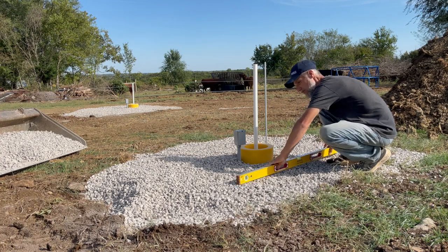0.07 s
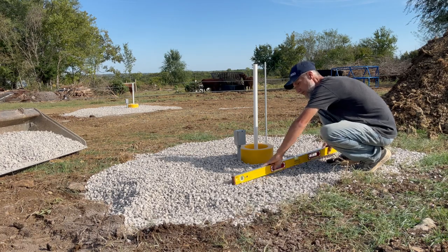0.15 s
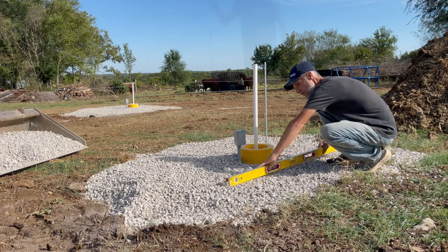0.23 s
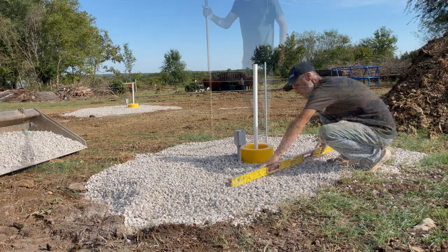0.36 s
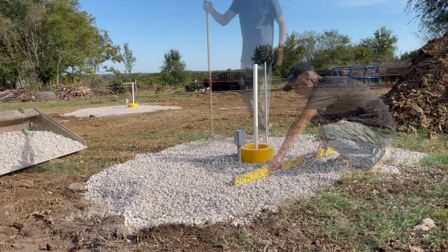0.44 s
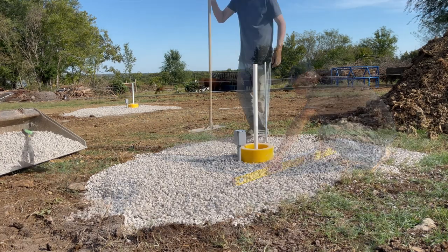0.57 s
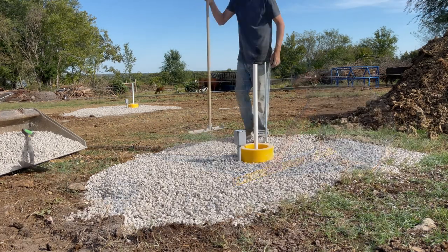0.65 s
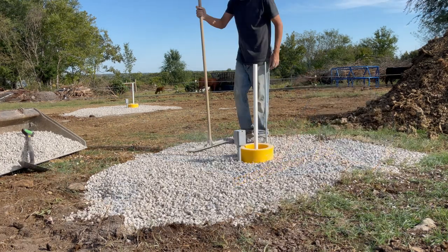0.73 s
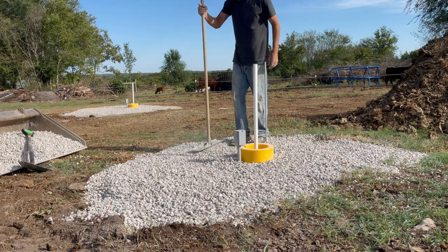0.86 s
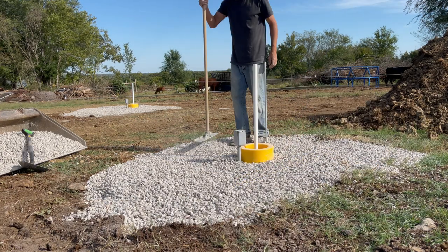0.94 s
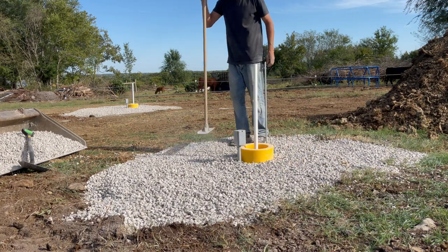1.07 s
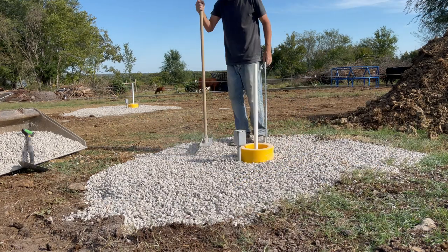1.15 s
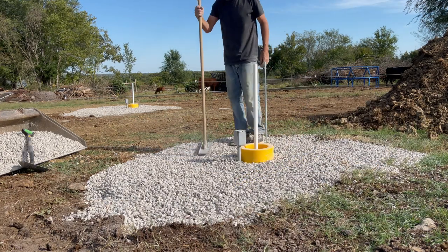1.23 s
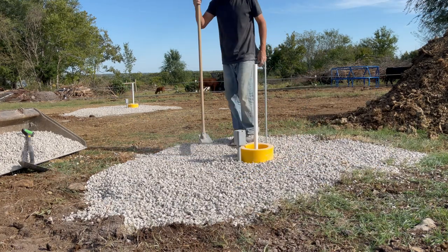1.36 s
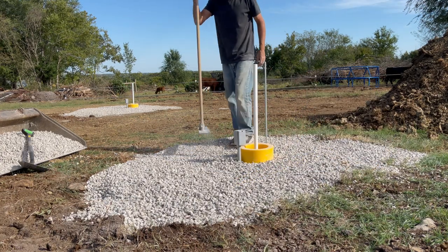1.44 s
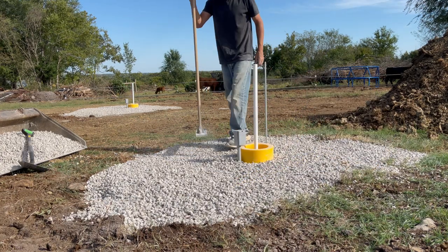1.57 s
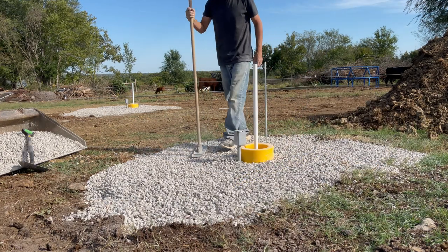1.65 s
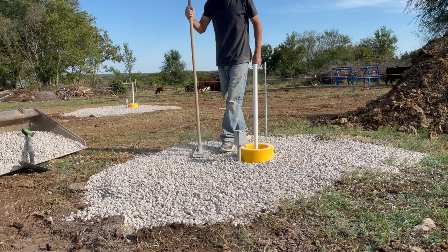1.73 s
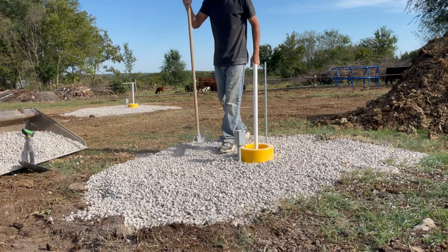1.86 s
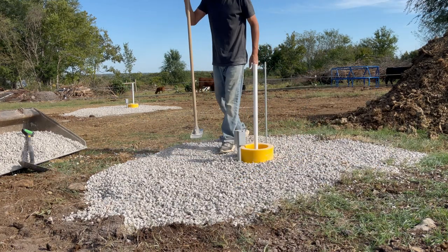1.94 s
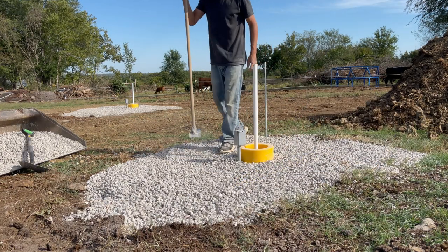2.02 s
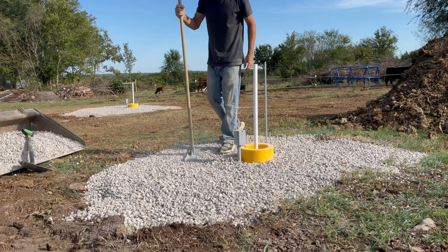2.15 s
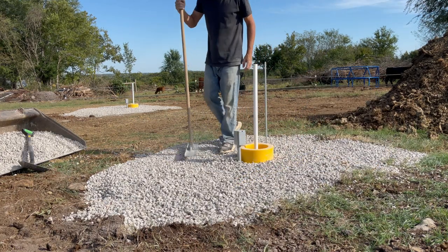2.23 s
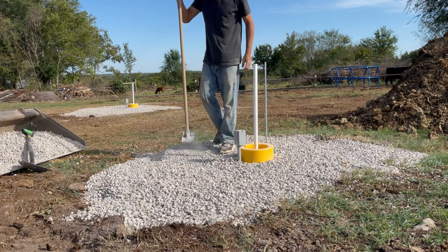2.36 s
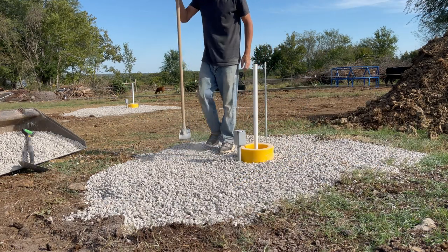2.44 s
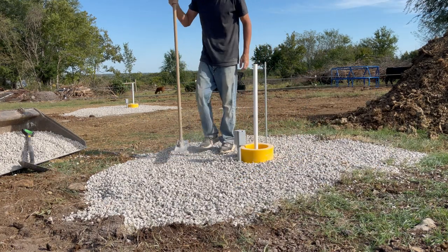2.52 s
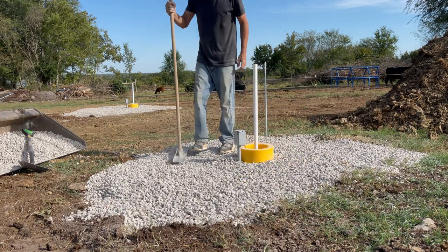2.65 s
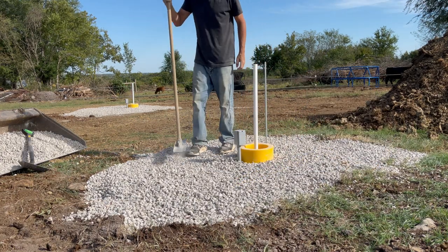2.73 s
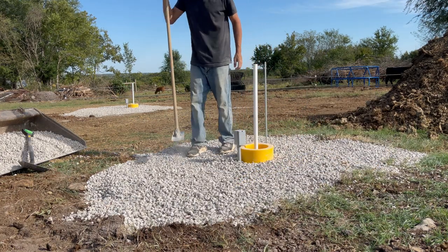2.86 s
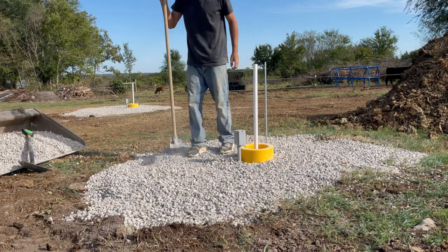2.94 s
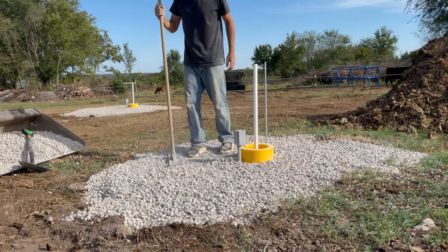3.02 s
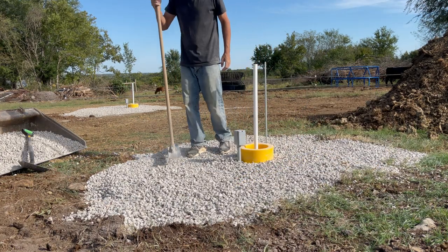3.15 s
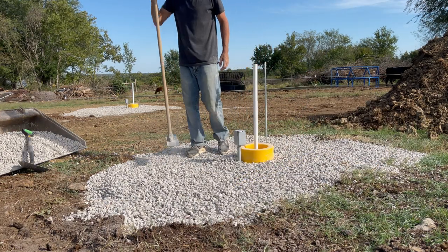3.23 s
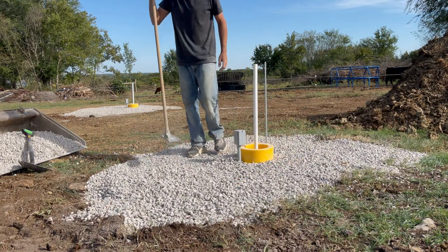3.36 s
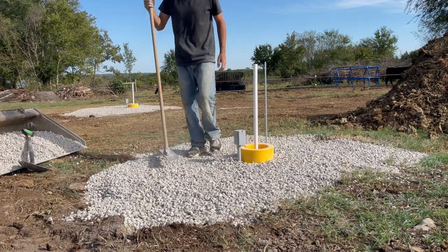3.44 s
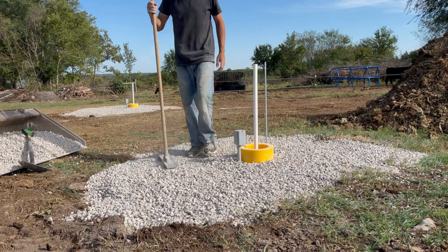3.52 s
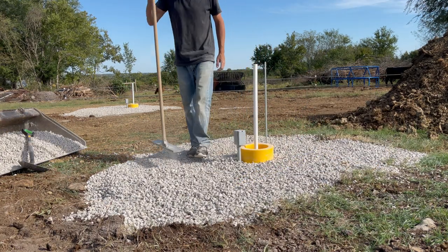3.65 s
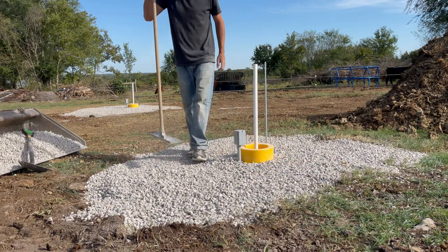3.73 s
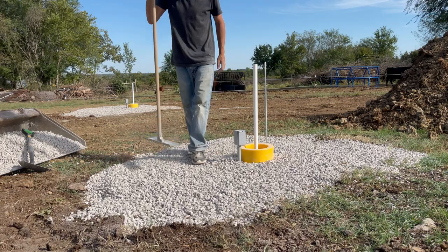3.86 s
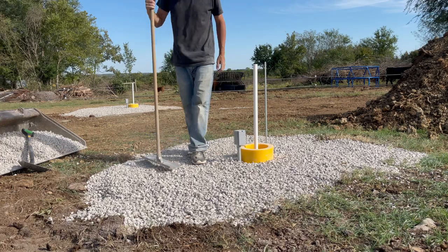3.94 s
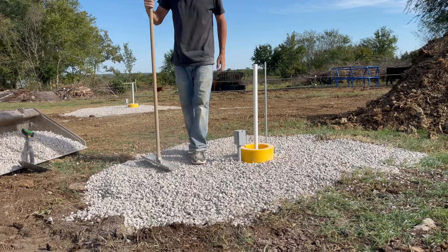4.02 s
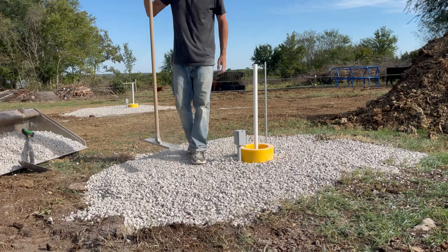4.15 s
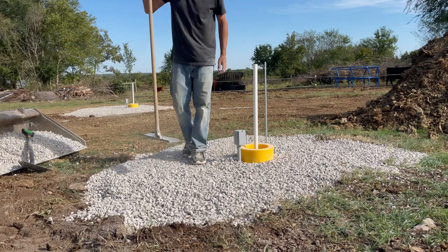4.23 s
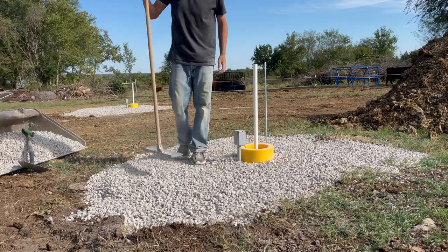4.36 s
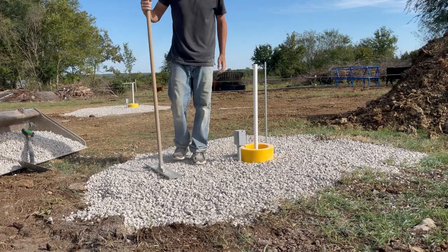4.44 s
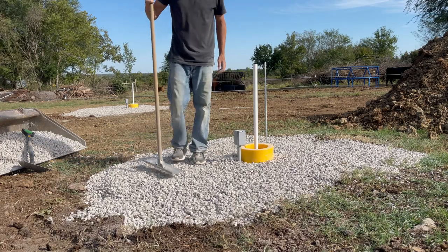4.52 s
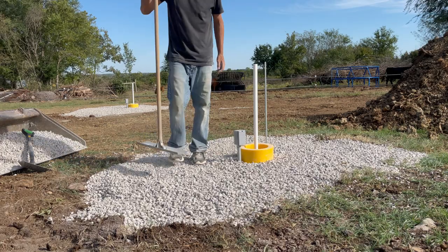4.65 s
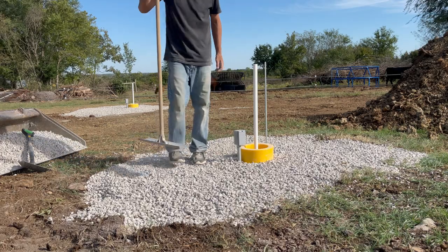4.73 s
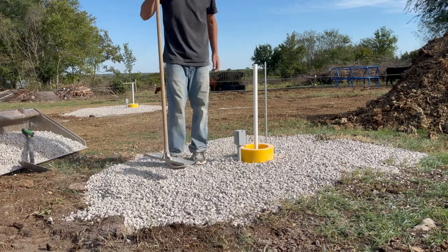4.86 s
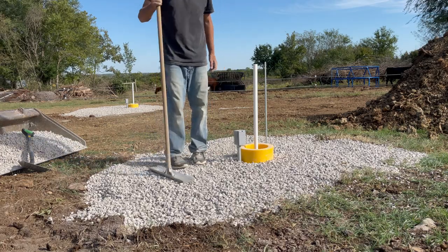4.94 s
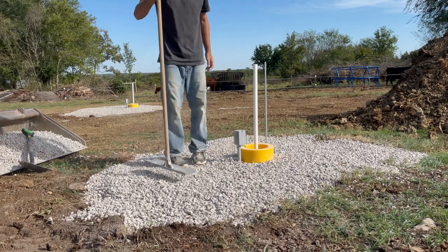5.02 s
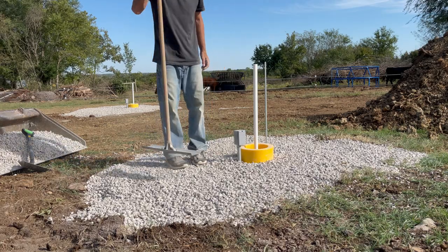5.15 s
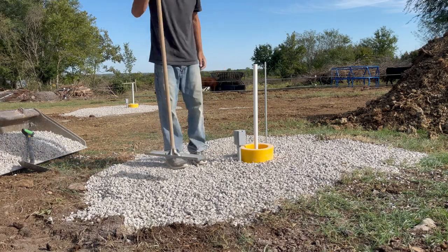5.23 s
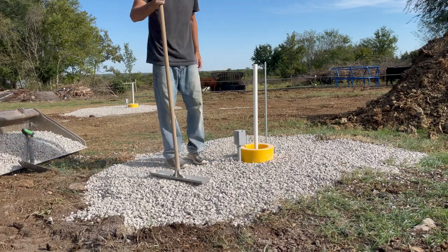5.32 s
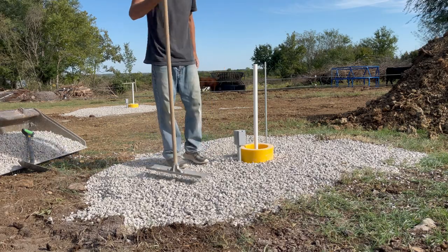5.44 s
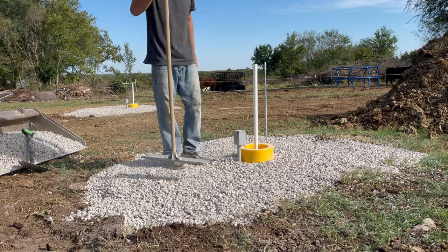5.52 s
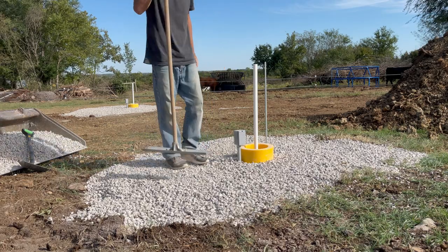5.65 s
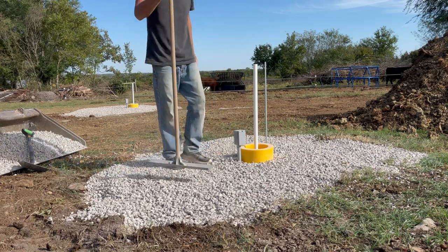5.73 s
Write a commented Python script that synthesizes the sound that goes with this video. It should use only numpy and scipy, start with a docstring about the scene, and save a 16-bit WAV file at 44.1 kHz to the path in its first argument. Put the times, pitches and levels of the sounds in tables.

```python
"""Hand tamper on crushed rock

A steel hand tamper is dropped on crushed rock again and again in an open field. Each blow crunches the
stones (filtered bursts of grains), thuds into the ground (a falling boom) and rings the plate (decaying modes).
Echoes return from around the field by convolution; boots scuff the gravel and single stones click.
Insects trill, buzz and tick (noise bands), two far birds call (partials), and gusts rumble on the microphone at first."""
import sys
import numpy as np
from scipy import signal
from scipy.fft import rfft, irfft, next_fast_len
from scipy.io import wavfile
from scipy.ndimage import uniform_filter1d

SR = 44100
rng = np.random.default_rng(int(sys.argv[2]) if len(sys.argv) > 2 else 0)


def to_wav(sig):
    """Store sig (one row per channel, or 1-D mono) as 16-bit WAV at the path in sys.argv[1].

    Samples outside -1..1 are clipped; the rate is SR.
    """
    pcm = np.clip(np.atleast_2d(sig), -1, 1) * 32767
    pcm = np.round(pcm).astype(np.int16)
    wavfile.write(sys.argv[1], SR, pcm.T)  # frames by channels


N = 255118
TIME = np.arange(N) / SR


def amp(db):
    """Level: decibels to amplitude gain."""
    return 10 ** (np.asarray(db) / 20)


def rms_one(x):
    """Normalisation: scale to unit rms."""
    return x / np.sqrt(np.mean(x ** 2) + 1e-20)


def in_time(rows):
    """Linear interpolation: each column of a (time, ...) table, sample by sample."""
    times, *columns = np.transpose(rows)
    return [np.interp(TIME, times, column) for column in columns]


def at_hz(points, hz):
    """Spectral interpolation: read (frequency, value) points on a log-frequency axis."""
    frequencies, values = np.array(points).T
    return np.interp(np.log(hz), np.log(frequencies), values)


def band(x, low_hz, high_hz):
    """Band limitation: a Butterworth band-pass."""
    edges = [low_hz, min(high_hz, .45 * SR)]
    return signal.sosfilt(signal.butter(2, edges, "band", fs=SR, output="sos"), x)


def drift(rate_hz):
    """Slow random modulation: low-passed chance at 100 knots per second, of rms 1."""
    knots = rng.standard_normal(int(N / SR * 100) + 2)
    r = np.exp(-2 * np.pi * rate_hz / 100)
    # a first pass over the knots settles the filter
    slow = signal.lfilter([1], [1, -r], np.tile(knots, 2))[len(knots):]
    return np.interp(TIME * 100, np.arange(len(knots)), rms_one(slow))


CENTRES = 220 * 2 ** np.arange(0, 6.4, 1 / 3)   # third-octave centres [Hz]


def bands(source):
    """Filter bank: overlapping third-octave slices, with centres, that add up between the end centres."""
    size = next_fast_len(N)
    spectrum = rfft(source, size)
    steps = 3 * np.log2(np.arange(1, size // 2 + 2) * SR / size)   # third-octaves
    masks = [np.cos(np.pi / 2 * np.clip(steps - 3 * np.log2(hz), -1, 1)) ** 2 for hz in CENTRES]
    return [(hz, irfft(spectrum * mask, size)[:N]) for hz, mask in zip(CENTRES, masks)]


STONE_T60_S = 0.007


def grains(per_s, spread_db, bed):
    """Stochastic contact: stone impacts of uneven size excite short resonances over a bed of noise; rms 1."""
    sizes = amp(spread_db * np.minimum(rng.exponential(1, N), 4)) * rng.choice([-1, 1], N)
    clicks = sizes * (rng.random(N) < per_s / SR) + 1e-18
    pitches_hz = np.linspace(500, 15500, 56) + rng.uniform(-120, 120, 56)
    dealt = rng.integers(0, 56, N)   # which pitch each contact gets
    r = amp(-60 / (STONE_T60_S * SR))
    rings = 0
    for k, hz in enumerate(pitches_hz):
        resonator = [1, -2 * r * np.cos(2 * np.pi * hz / SR), r * r]
        rings = rings + signal.lfilter([1, 0, -1], resonator, clicks * (dealt == k))
    return rms_one(rms_one(rings) + .5 * rms_one(clicks) + bed * rng.standard_normal(N))


# wind rumble: (time [s], level [dB])
WIND = [(0.0, -79), (0.29, -55.5), (0.5, -80), (0.8, -70), (1.7, -76), (1.88, -60.5), (2.05, -73),
        (3.5, -77), (4.5, -78.5), (4.9, -72.5), (5.78, -75)]
# single gusts: (time [s], level [dB], half length [s])
GUSTS = [(.005, -52, 0.0074), (0.096, -47, 0.033), (0.16, -44, 0.02), (0.234, -43, 0.025), (0.41, -55, .03),
         (0.479, -39.5, 0.02), (0.582, -45.5, 0.048)]
# hiss spectrum: (frequency [Hz], gain [dB])
AIR = [(150, -49), (250, -7.5), (1440, -16), (3230, -15), (6000, -24), (11400, -28), (15100, -27),
       (16500, -41)]
AIR_DB = -77   # rms of the whole hiss


def air():
    """Wind noise: low-frequency pressure fluctuations at the microphone, over the field's faint hiss."""
    rumble = rms_one(band(rng.standard_normal(N), 30, 230))
    buffet = band(rng.standard_normal(N), 41, 101)
    # evened out so that each gust lands with its full weight
    buffet = buffet / np.sqrt(uniform_filter1d(buffet ** 2, size=1500) + 1e-12)
    swells = sum(amp(db) * np.exp(-((TIME - s) / half) ** 2) for s, db, half in GUSTS)
    hiss = sum(amp(at_hz(AIR, hz)) * part for hz, part in bands(rng.standard_normal(N)))
    rumble_level = amp(in_time(WIND)[0] + 2.0 * drift(4.1))
    return rumble_level * rumble + swells * buffet + amp(AIR_DB) * rms_one(hiss)


# cricket trill: (frequency [Hz], half width [Hz], throb rate [1/s])
CRICKET = (7780, 220, 26.5)
# swell of the trill: (time [s], level [dB])
CRICKET_SWELL = [(0.0, -86), (1.5, -87), (2.4, -84), (3.6, -77), (4.4, -80), (5.78, -86)]
# high insect chorus: (frequency [Hz], width [Hz], level [dB])
BUZZ = (11600, 1400, -84)
# a katydid ticking: (time [s], level [dB], 7 dB above the tick's envelope)
TICKS = [(2.552, -76), (2.7601, -64), (2.825, -66), (2.8913, -51.5), (2.9567, -54), (3.022, -59),
         (3.1512, -43), (3.2176, -66), (3.282, -63)]


def insects():
    """Amplitude modulation: noise bands shaped into a throbbing trill, a wide high buzz and lone ticks."""
    hz, half_hz, throbs = CRICKET
    throb = np.clip(.8 + np.sin(2 * np.pi * throbs * TIME + .6 * drift(2)), .45, None)
    trill_level = amp(in_time(CRICKET_SWELL)[0] + 1.5 * drift(3))
    trill = rms_one(throb * band(rng.standard_normal(N), hz - half_hz, hz + half_hz))
    hz, width_hz, level_db = BUZZ
    buzz_level = amp(level_db + 3.0 * drift(1.8) + 2.0 * drift(30))
    buzz = rms_one(band(rng.standard_normal(N), hz - width_hz / 2, hz + width_hz / 2))
    # each tick is loudest 4 ms after its time
    gate = sum(amp(db - 7) * np.exp(-((TIME - s - .004) / 0.0032) ** 2) for s, db in TICKS)
    ticks = gate * rms_one(band(rng.standard_normal(N), 13300, 18900))
    return trill_level * trill + buzz_level * buzz + ticks


# boots scuff the loose gravel:
# (loudest time [s], level [dB], rise [s], fall t60 [s], brightness near 6.4 kHz [dB], sheen from 11 kHz up [dB])
SCUFFS = [(.03, -54.5, 0.051, 0.41, -3, -16), (0.077, -34, 0.011, 0.049, 8, -24),
          (.102, -32.5, 0.0057, 0.034, -16, -7), (.152, -31, 0.023, 0.49, -0.5, -7),
          (0.271, -33, 0.02, 0.18, 0.5, -3), (0.329, -44.5, 0.037, 0.1, 8, 5),
          (0.429, -36.5, 0.035, 0.45, -2, -10.5), (0.629, -49.5, 0.017, 0.29, 1.5, -37),
          (0.893, -37, 0.027, 0.17, 4.5, -10), (.94, -45.5, 0.013, 0.34, 3, -19),
          (1.041, -57.5, 0.022, 0.54, 3.5, -23.5), (1.919, -46.5, 0.089, 0.46, -6.5, -19),
          (4.911, -49, 0.021, 0.9, -6.5, -4), (5.54, -50, 0.025, 0.15, 11.5, 10.5)]
# gravel spectrum: (frequency [Hz], gain [dB])
GRIT = [(200, -16.5), (500, -9.5), (900, -5.5), (1500, -3), (2500, 0.5), (4000, -7), (6400, -8.5),
        (9000, -12), (12000, -9), (16000, -10.5)]


def gravel():
    """Granular friction: dense stone contacts swell and die under each scuff, each with its own brightness."""
    s, level_db, rise, t60, bright_db, sheen_db = np.transpose(SCUFFS)[:, :, None]
    since = TIME - s
    shapes = np.where(since < 0, np.exp(-(since / rise) ** 2), amp(-60 * np.abs(since) / t60))
    out, clumps = np.zeros(N), drift(35)
    for hz, part in bands(grains(5000, 2.8, bed=.8)):
        tip_db = bright_db * at_hz([(2000, 0), (6400, 1), (11000, 0)], hz)
        tip_db = tip_db + sheen_db * at_hz([(6400, 0), (11000, 1)], hz)
        envelope = amp(level_db + tip_db)[:, 0] @ shapes   # all scuffs together
        out += amp(at_hz(GRIT, hz) + 0.66 * drift(15)) * envelope * part
    return amp(2.9 * clumps) * out


# single stones clicking: (time [s], level [dB], 4 dB above the knock's starting rms, tick against knock [dB])
STONES = [(0.0348, -54, -13), (0.0749, -31, 10.5), (0.1306, -39, -8), (0.171, -36, -9), (0.2498, -51, -8),
          (0.2927, -29, 1), (0.5761, -44.5, 3), (0.629, -64, -17), (0.8683, -36.5, 1), (0.9141, -31, -19),
          (1.3854, -46.5, -14), (1.4494, -66, -8), (1.5994, -77, 0.5), (3.8094, -48, 0.5),
          (5.5222, -55, -8), (5.5444, -57, -19.5), (5.6708, -62, 16)]


def stones():
    """Impact transient: a click is briefly decaying noise, a dull knock and a bright tick."""
    out, t = np.zeros(N), np.arange(int(.04 * SR)) / SR
    noise = rng.standard_normal((len(STONES), len(t)))
    for (s, level_db, treble_db), puff in zip(STONES, noise):
        at = round(s * SR)
        knock = rms_one(band(puff, 1400, 7400)) * amp(-60 * t / 0.062)
        tick = rms_one(band(puff, 4500, 22300)) * amp(treble_db - 60 * t / 0.019)
        out[at:at + len(t)] += amp(level_db - 4) * (knock + tick)
    return out


# blows, also read by plate() and thud(): (time [s], crunch level [dB], 1.5 dB above its rms over 10 ms,
# colour at the six COLOUR_HZ [dB], crunch length [s], rattle [dB],
# thud level [dB], thud's early weight [dB], thud length [s])
BLOWS = [(0.3695, -21.5, -9.5, 4, 6.5, 1.5, -3, 2.5, 0.0034, -14, -45.5, 10.5, 0.04),
         (0.8051, -9.5, -12.5, -0.5, 8, -3, -9, -0.5, 0.0046, -14.5, -36, 7, 0.022),
         (1.24, -8.5, -7.5, -4.5, -3.5, -3.5, -5, -2.5, 0.0041, -14, -43, 20, 0.038),
         (1.715, -10, 0.5, 6.5, 1, 2, 1, 1.5, 0.0021, -20, -39, -5, 0.053),
         (2.183, -9, -5, 0.5, 5, 0.5, -2.5, 3, 0.0033, -16, -40, 1.5, 0.06),
         (2.6247, -9, -1.5, -1.5, 5, -4.5, -5, -2, 0.0019, -23, -42, 13.5, 0.047),
         (3.0622, -9, -10.5, 5, 5, -0.5, 1, 0.5, 0.0084, -15.5, -50.5, -3, 0.061),
         (3.523, -8, -18, -1.5, -2, -2, -6, -6.5, 0.0018, -9.5, -40, 9.5, 0.03),
         (4.0102, -7.5, 7.5, 3.5, -1, 2, -6.5, -1.5, 0.0062, -9.5, -39, 13, 0.016),
         (4.4794, -9, -9, 6, 2.5, 2.5, -1, 3, 0.0029, -12, -35, 3, 0.032),
         (4.9627, -9, -14.5, 0, -0.5, 0.5, -8.5, 2.5, 0.0056, -13.5, -37.5, 10.5, 0.036),
         (5.3829, -9.5, -6.5, 1, 5, 1.5, -10, 3, 0.0044, -14.5, -40, 4.5, 0.035)]
# the plate lands a second time, also read by plate(): (time [s], crunch level [dB], as in BLOWS)
BOUNCE = [(4.0527, -32)]
# where the colours apply, against 2100 Hz: frequency [Hz]
COLOUR_HZ = [300, 800, 1400, 3200, 4500, 9500]
# crunch spectrum: (frequency [Hz], gain [dB])
CRUNCH = [(150, -42), (250, -12.5), (656, -18.5), (2090, -5.5), (3120, -1), (4200, -2), (7900, -5),
          (9750, -14.5), (12000, -11), (15700, -17.5), (16500, -29.5)]
# decay of the rattle: (frequency [Hz], t60 [s])
CRUNCH_T60 = [(300, 0.13), (1000, .12), (3000, 0.14), (8000, 0.1), (15000, 0.083)]


def crunch():
    """Two-stage decay: stones crack together and stop short; a slower rattle dies band by band behind."""
    out, size = np.zeros(N), int(.3 * SR)
    t = np.arange(size) / SR
    hits = [row[:10] for row in BLOWS]
    hits += [(*BOUNCE[0], -3, 3, 0, 0, 0, 1.5, .006, -8)]   # colour, length and rattle of the bounce
    slices = bands(grains(9000, 3.3, bed=0.72))
    patches = rng.normal(0, 2.0, (len(hits), len(slices)))   # other stones under each blow [dB]
    for (s, level_db, *tint_db, length, rattle_db), patch in zip(hits, patches):
        at, burst = round(s * SR), np.zeros(size)
        colours = sorted([*zip(COLOUR_HZ, tint_db), (2100, 0)])
        for (hz, part), patch_db in zip(slices, patch):
            gain = amp(at_hz(CRUNCH, hz) + at_hz(colours, hz) + patch_db)
            late = np.clip(t - 0.00087 * np.clip(2000 / hz - 1, 0, 4), 0, None)   # lows swell later
            onset = 1 - np.exp(-late / 0.0001)
            after = np.clip(late - length, 0, None)
            crack = amp(-60 * after / 0.033)
            rattle = amp(rattle_db - 60 * after / at_hz(CRUNCH_T60, hz))
            burst += gain * onset * (crack + rattle) * part[at:at + size]
        early_rms = np.sqrt(np.mean(burst[:int(.01 * SR)] ** 2))
        out[at:at + size] += amp(level_db - 1.5) * burst / early_rms
    return out


# plate modes: (frequency [Hz], t60 [s])
PLATE = [(608, .2), (915.8, 1.0), (1190, .28), (1537, .3), (1855.8, 1.6), (2166, .25), (2309, .7),
         (2368, .6), (2445, .6), (2525, .6), (2823, .17), (2907, .3), (3239.5, .58), (3601, .27),
         (3725, .25), (4060, .33), (4513, .22), (4845, .25), (5013, .36), (5502, .27), (6055, .2),
         (6478, .18)]
# the modes that stand out: place in PLATE, from 0
LEADING = [1, 2, 4, 6, 7, 8, 9, 10, 12, 13, 15, 18, 19, 20]
# where the plate meets the stones sets how each blow rings:
# (lift of the minor modes [dB], then the level of each leading mode [dB])
RING = [(-8, -70, -75, -70, -80, -78, -79, -77, -61, -41, -51, -89, -55, -59, -60),
        (3, -58.5, -51, -63, -72, -56, -82, -52, -56, -43, -39, -65, -40, -50, -42.5),
        (-8, -64.5, -52, -66, -72, -82, -53.5, -56, -69, -58, -74, -41.5, -57, -65, -77),
        (-10, -66, -56, -55.5, -78, -79, -91, -62, -55, -47, -58, -52.5, -68, -64, -71),
        (0, -59, -54.5, -37, -91, -80, -84, -81, -28.5, -24, -75, -38, -44.5, -37.5, -51.5),
        (-2, -70, -47, -61.5, -68, -90, -90, -56.5, -43, -51, -53.5, -47, -47, -46, -52),
        (0, -71, -42.5, -42, -81, -81, -88, -65, -65, -45.5, -74, -40.5, -26.5, -46.5, -64),
        (8, -61, -28.5, -35, -52, -58, -74, -58, -25.5, -35, -42.5, -36, -36, -29.5, -42.5),
        (12, -36, -45, -53, -47, -40.5, -39.5, -56, -46.5, -44, -34.5, -46, -40.5, -44, -34),
        (2, -60, -41, -45, -51, -80, -47, -74, -46.5, -50.5, -54, -37.5, -39.5, -25.5, -27.5),
        (3, -64, -58, -45.5, -65, -81, -82, -47, -35, -42, -36.5, -62, -40, -64, -54.5),
        (0, -59, -48.5, -50, -48, -46.5, -62, -46.5, -32.5, -54.5, -38.5, -35.5, -46.5, -68, -64)]
# usual level of the other modes, low to high: level [dB]
MINOR_DB = [-64, -57.5, -52, -62.5, -68.5, -45.5, -66.5, -51]
MINOR_SPREAD_DB = 4.5   # from blow to blow
# three modes have a close twin: (place in PLATE, from 0, gap below it [Hz], sign at the blow)
TWINS = [(1, 5.5, -1), (4, 2.55, 1), (12, 3.4, 1)]
# how hard each blow rings the three twins, each against its partner: (first [dB], second [dB], third [dB])
TWIN_SHARE = [(2, -10, -25), (-12, -20, -25), (-10, -15, -10), (-12, -20, -18), (-5, -20, -25),
              (0, -18, -10), (4, -25, -18), (-15, -22, -4), (-14, -20, -13), (3, -1, -20), (-10, -10, -20),
              (1, -.4, -20)]
# modes the second landing wakes: (frequency [Hz], level [dB], t60 [s])
BOUNCE_RING = [(3700, -28.5, 0.098), (5700, -34, 0.13), (6478, -33, 0.1), (8100, -36, 0.048)]
# stones graze the plate as it is lifted and wake one mode: (time [s], frequency [Hz], level [dB], t60 [s])
GRAZES = [(.88, 3239, -40, 0.64), (.88, 2210, -33.5, 0.24), (.92, 2525, -46, 0.56), (.93, 4060, -52, 0.41),
          (.97, 1855, -68, 1.9), (4.58, 3239, -49, .6), (4.58, 2525, -54, .5), (5.5, 3239, -45, .6),
          (5.53, 2363, -45.5, 0.45), (5.53, 2445, -57, 0.71)]


def mode(t, hz, level_db, t60):
    """Damped oscillation: a sine under exponential decay."""
    return amp(level_db - 60 * t / t60) * np.sin(2 * np.pi * hz * t)


def plate():
    """Modal superposition: each blow replaces the last blow's ring; twins of the near-square plate beat."""
    out = np.zeros(N)
    starts = [round(row[0] * SR) for row in BLOWS] + [N]
    minor = [k for k in range(len(PLATE)) if k not in LEADING]
    luck = rng.standard_normal((len(BLOWS), len(minor)))
    for (lift_db, *leading_db), chance, shares, a, b in zip(RING, luck, TWIN_SHARE, starts, starts[1:]):
        t, levels = np.arange(b - a) / SR, np.zeros(len(PLATE))
        levels[LEADING] = leading_db
        levels[minor] = lift_db + np.array(MINOR_DB) + MINOR_SPREAD_DB * chance
        ring = sum(mode(t, hz, level_db, t60) for (hz, t60), level_db in zip(PLATE, levels))
        for (k, gap_hz, sign), share_db in zip(TWINS, shares):
            hz, t60 = PLATE[k]
            ring = ring + sign * mode(t, hz - gap_hz, levels[k] + share_db, t60)
        out[a:b] = ring * (1 - np.exp(-t / 0.0015))
    since = np.clip(TIME - BOUNCE[0][0], 0, None)   # the sines are silent at zero
    out += sum(mode(since, hz, level_db, t60) for hz, level_db, t60 in BOUNCE_RING)
    for s, hz, level_db, t60 in GRAZES:
        a = round(s * SR)
        b = min(start for start in starts if start > a)   # until the next blow or the end
        t = np.arange(b - a) / SR
        out[a:b] += (1 - np.exp(-t / .025)) * mode(t, hz, level_db, t60)
    return out


def thud():
    """Dispersion: in slow ground travel higher waves come first, so the boom falls in pitch, then stops."""
    out, t = np.zeros(N), np.arange(int(.3 * SR)) / SR
    soil = rms_one(band(rng.standard_normal(N), 63, 130))
    boom = np.sin(2 * np.pi * np.cumsum(92 + 75 * np.exp(-t / 0.013)) / SR)   # 167 Hz towards 92 Hz
    for s, *_, level_db, early_db, length in BLOWS:
        at = round((s + .006) * SR)
        early = early_db * np.exp(-(t / 0.0027) ** 2)
        stop = -60 * np.clip(t - length, 0, None) / 0.03
        shape = (1 - np.exp(-t / 0.00043)) * amp(early + stop)
        tail = 1.4 * (1 - np.exp(-t / 0.0054)) * soil[at:at + len(t)] * amp(-60 * t / 0.24)
        out[at:at + len(t)] += amp(level_db) * (shape * boom + tail)
    return out


# things standing round the field send each blow back:
# (delay [s], level [dB], smear [s], loss at 6 kHz [dB], loss at 11 kHz [dB])
ECHOES = [(.075, -54, 0.0026, 27, 20), (0.093, -64, 0.0044, 9, 10), (0.141, -60, 0.0028, 7.5, 12.5),
          (.232, -76, .025, 2.5, 17.5), (0.284, -68, 0.0022, 13.5, 20), (.024, -48.5, .003, -2.5, 8),
          (0.334, -80.5, .03, 12, 22)]
SCATTER_DB, SCATTER_RISE_S = -65, 0.12   # grass, heaps and trees scatter the rest
# decay of the scatter: (frequency [Hz], t60 [s])
SCATTER_T60 = [(300, 0.3), (1000, 1), (3000, 0.64), (6000, .6), (11000, 0.54)]
# what the surroundings send back best: (frequency [Hz], gain [dB])
FIELD_COLOUR = [(300, 3.5), (1000, 4.5), (2500, -2), (5000, 3)]


def field(x):
    """Reflection and scattering: convolve with smeared echoes, filtered on the way, over a decaying scatter."""
    size = int(.7 * SR)
    t, response = TIME[:size], np.zeros(size)
    for hz, part in bands(rng.standard_normal(N)):
        rise = np.clip(t / SCATTER_RISE_S, 0, 1) ** 2
        power = (amp(SCATTER_DB - 60 * t / at_hz(SCATTER_T60, hz)) * rise) ** 2
        for delay, level_db, smear, mid_db, top_db in ECHOES:
            loss_db = at_hz([(2500, 0.0061), (6000, mid_db), (11000, top_db)], hz)
            power += (amp(level_db - loss_db) * np.exp(-((t - delay) / smear) ** 2)) ** 2
        response += amp(at_hz(FIELD_COLOUR, hz)) * np.sqrt(power) * part[:size]
    return signal.fftconvolve(x, response)[:N]


# a rough call: (time [s], second harmonic [Hz], level [dB])
CROW = [(1.8, 1319, -82), (1.81, 1222, -60), (1.86, 1152, -55), (1.9, 1263, -51), (1.916, 1197, -54),
        (1.984, 1144, -69), (2.0, 1280, -68), (2.1, 1188, -82)]
# a whistled call: (time [s], frequency [Hz], level [dB])
WHISTLE = [(4.76, 1190, -86), (4.778, 1335, -78), (4.804, 1410, -72), (4.86, 1177, -74),
           (4.87, 1107, -92.5)]


def call(rows, harmonics, rough_db):
    """Harmonic synthesis: a far bird's partials on a pitch curve, faded in and out, roughened by a flutter."""
    hz, level_db = in_time(rows)
    phase = 2 * np.pi * np.cumsum(hz) / SR
    fade = np.clip(np.minimum(TIME - rows[0][0], rows[-1][0] - TIME) / 0.017, 0, 1)
    voice = sum(amp(db) * np.sin(k * phase) for k, db in harmonics)
    return np.sqrt(2) * amp(level_db + rough_db * drift(40)) * fade * voice


def scene():
    """Linear superposition: all sources add at one microphone."""
    # partials: (multiple of the pitch curve, level [dB])
    birds = call(CROW, [(.5, -14), (1, -2.0), (1.5, -8), (2, -14)], rough_db=3.5)
    birds += call(WHISTLE, [(1, 0.012)], rough_db=0.53)
    blows = crunch()
    struck = blows + field(blows) + plate() + thud()
    return (struck + gravel() + stones() + air() + insects() + birds)[None]


CUTOFF_HZ = 17000


def record(dry):
    """Saturation and band limits: peaks are rounded, the deepest bass and the top are cut."""
    x = signal.sosfilt(signal.butter(3, 52, "high", fs=SR, output="sos"), np.tanh(dry))
    return signal.sosfilt(signal.cheby2(14, 80, CUTOFF_HZ, fs=SR, output="sos"), x)


dry = scene()
out = record(dry)
to_wav(out)
```